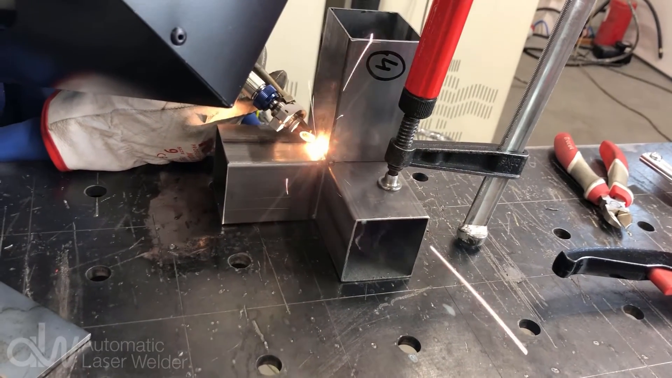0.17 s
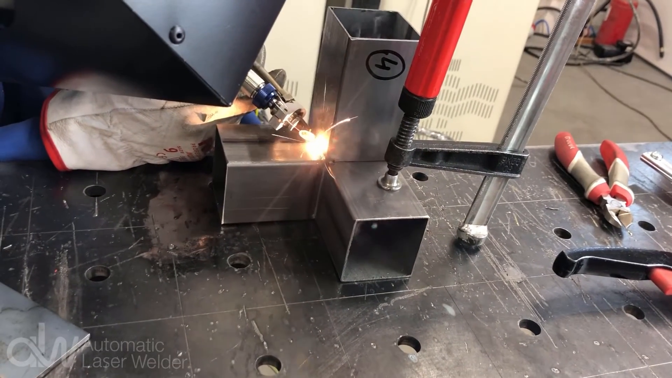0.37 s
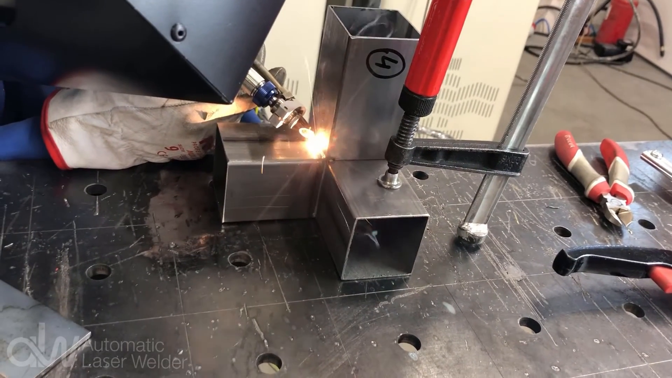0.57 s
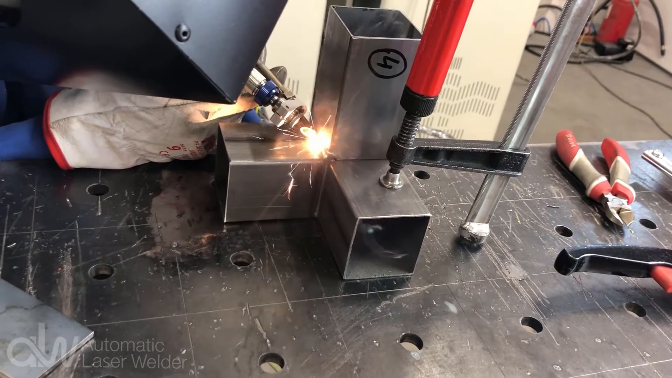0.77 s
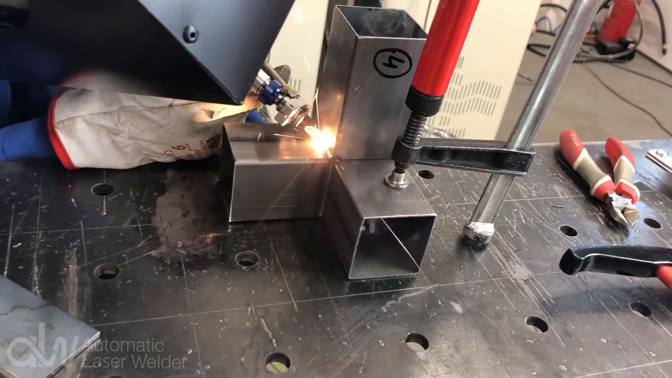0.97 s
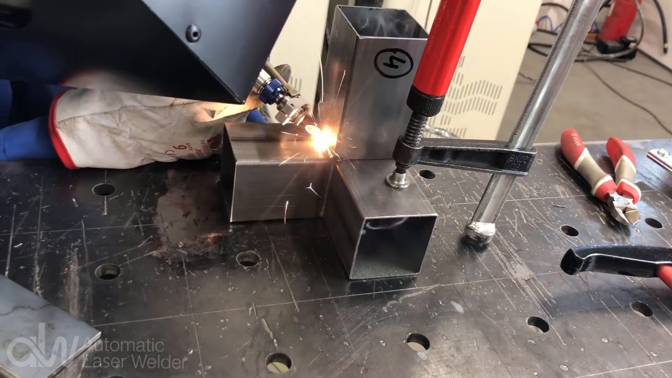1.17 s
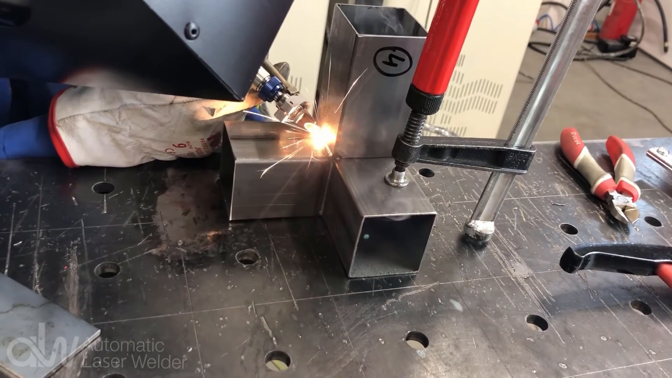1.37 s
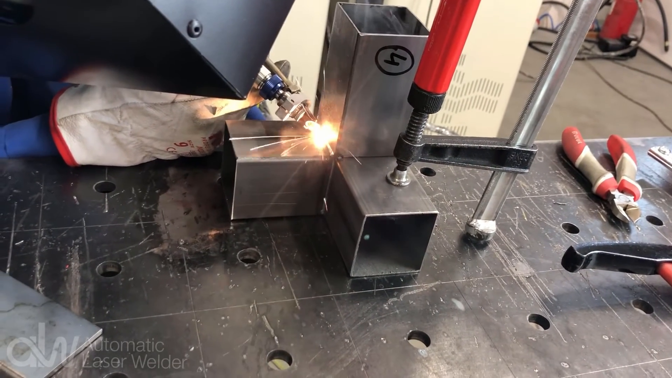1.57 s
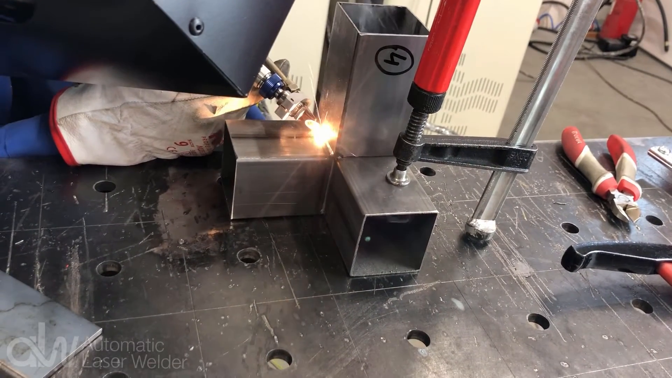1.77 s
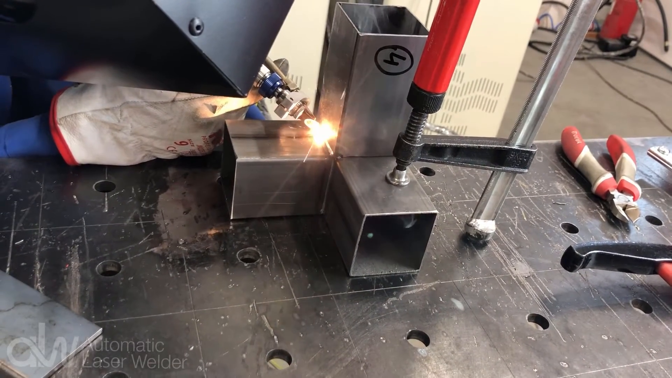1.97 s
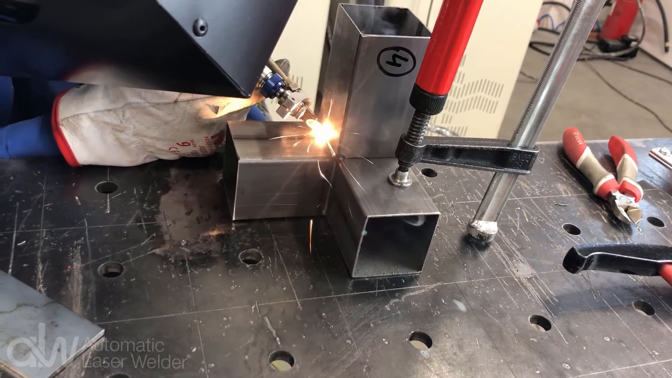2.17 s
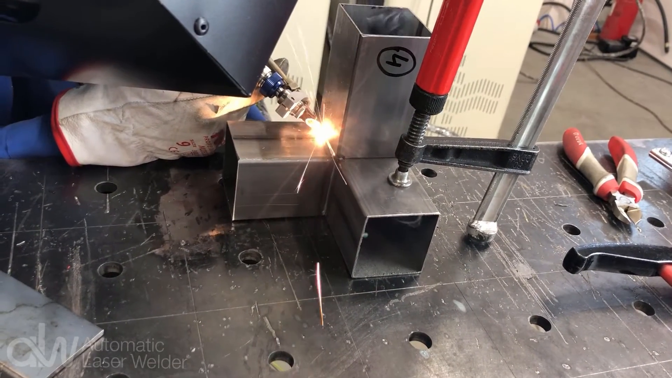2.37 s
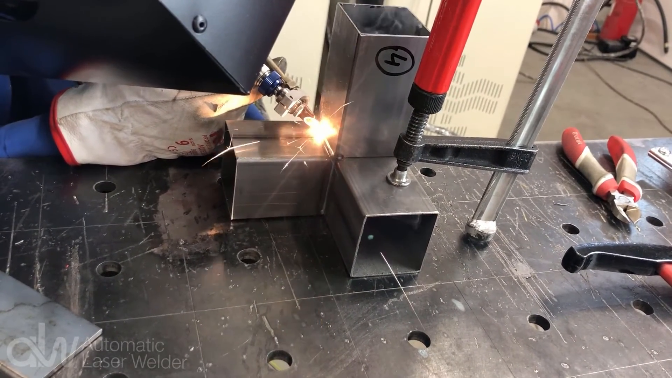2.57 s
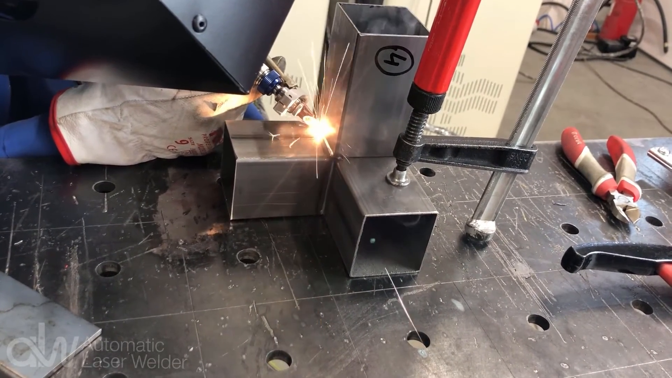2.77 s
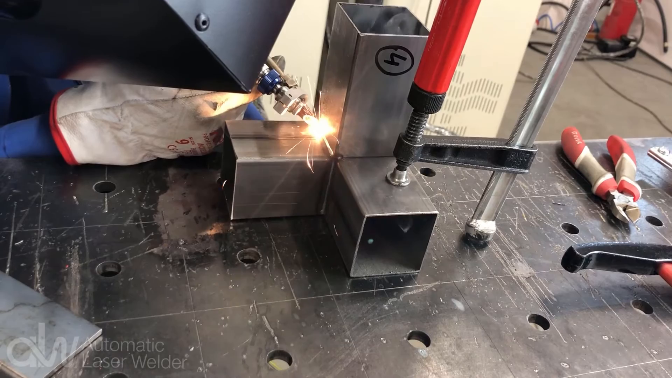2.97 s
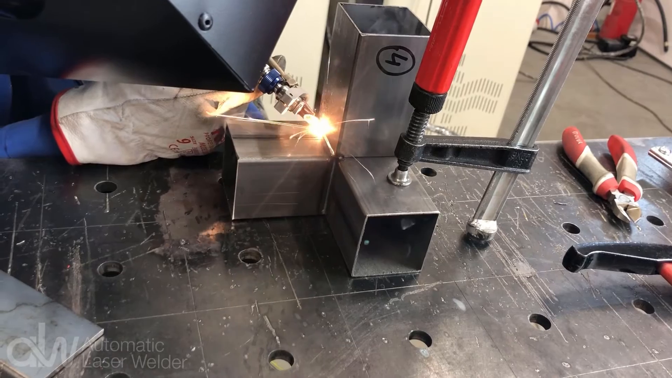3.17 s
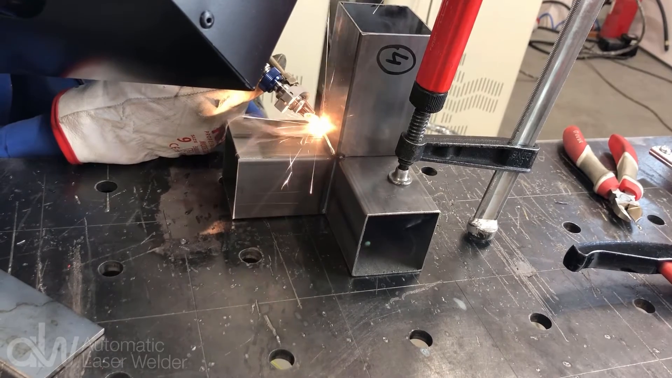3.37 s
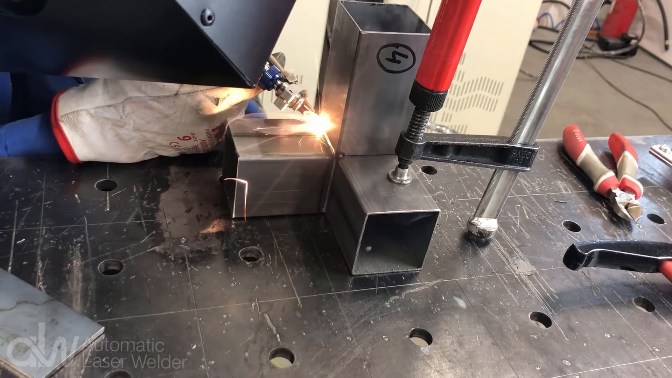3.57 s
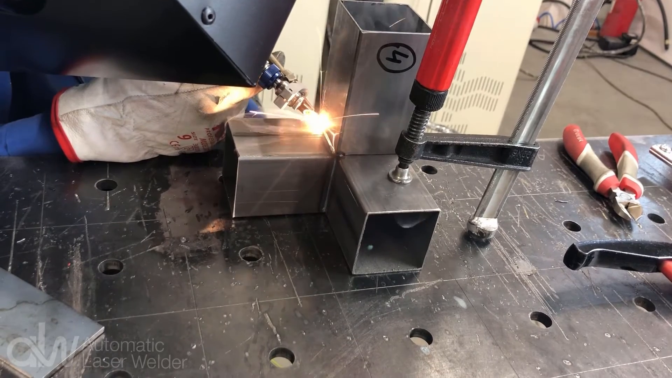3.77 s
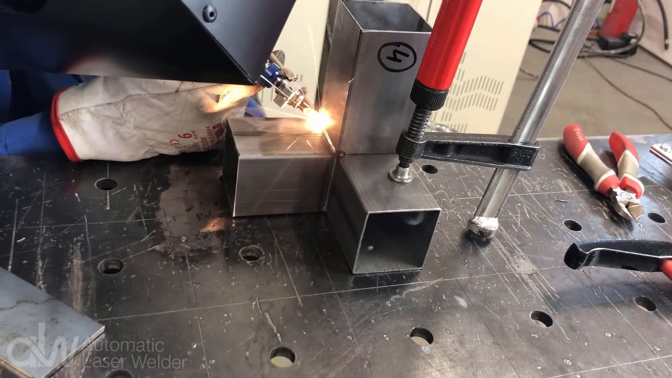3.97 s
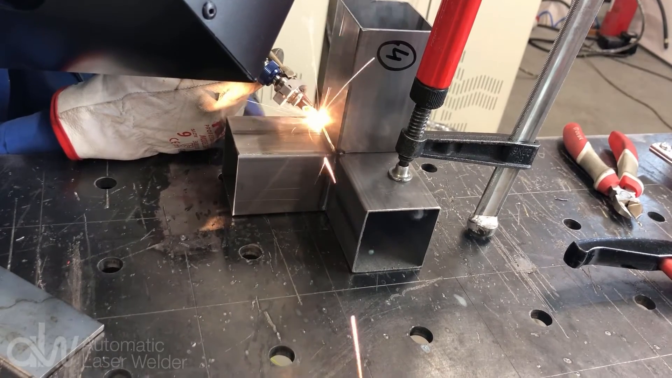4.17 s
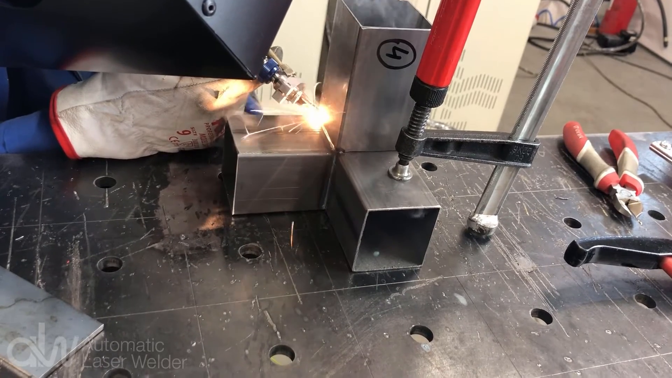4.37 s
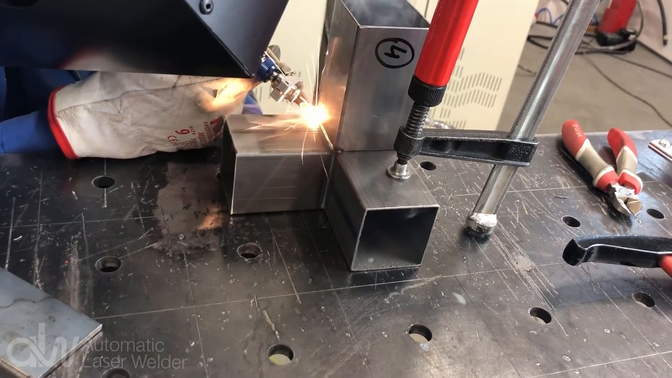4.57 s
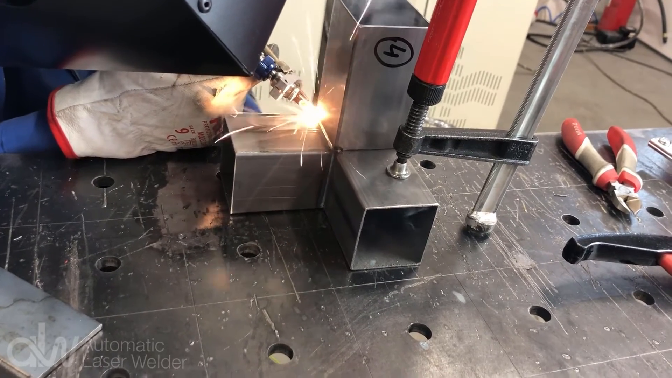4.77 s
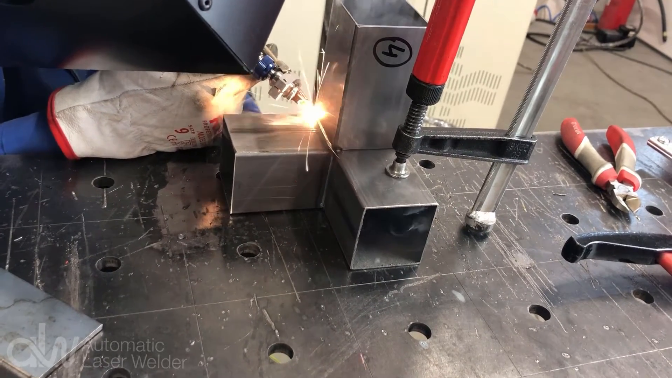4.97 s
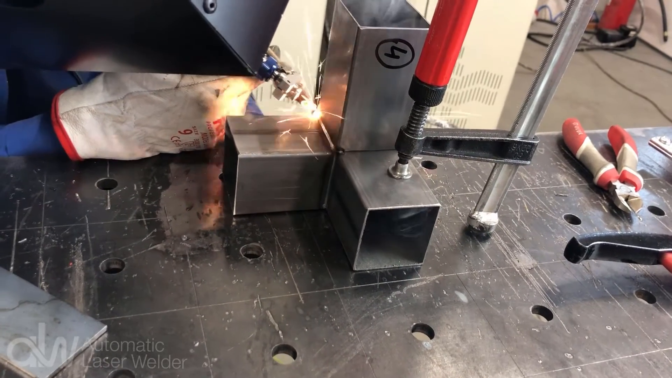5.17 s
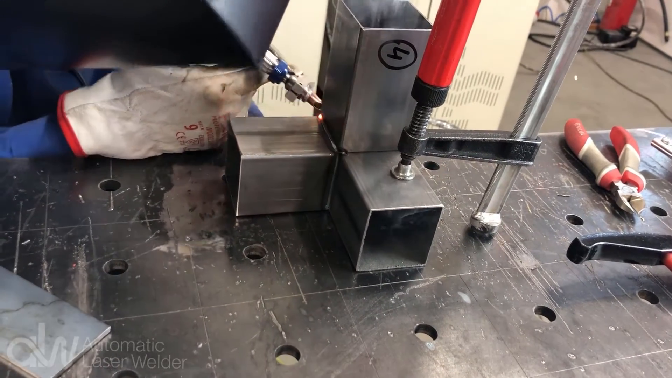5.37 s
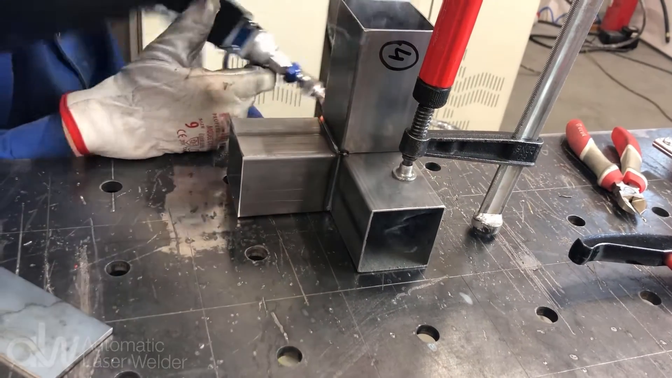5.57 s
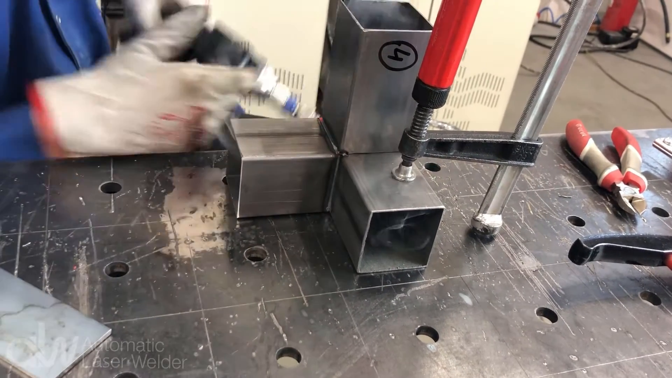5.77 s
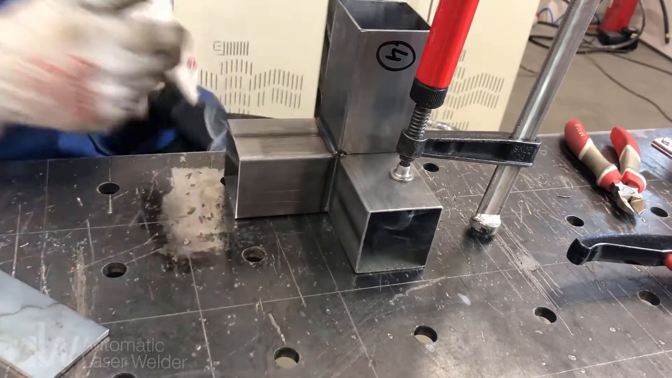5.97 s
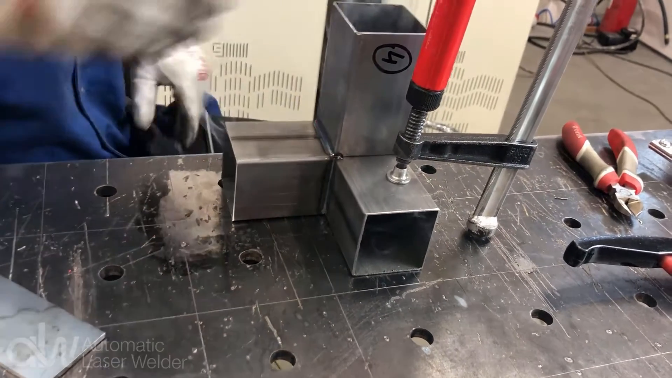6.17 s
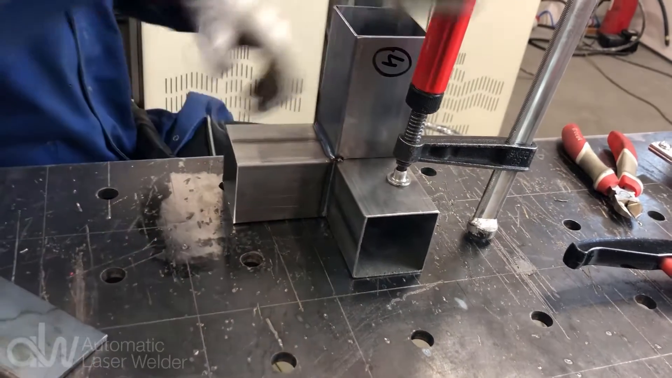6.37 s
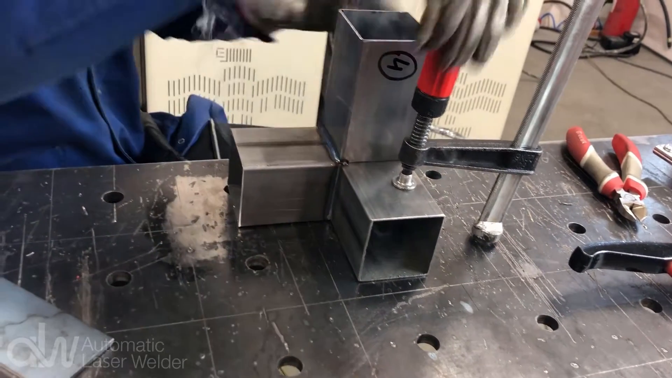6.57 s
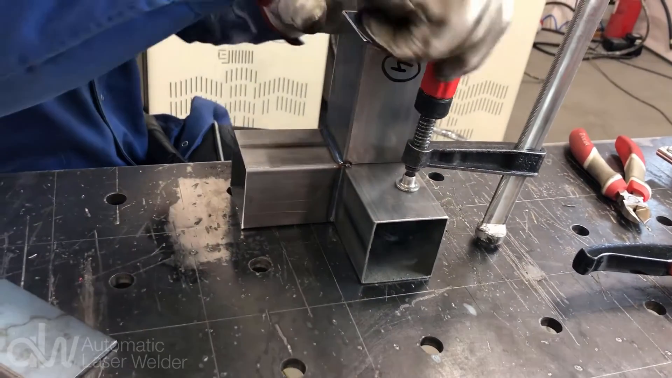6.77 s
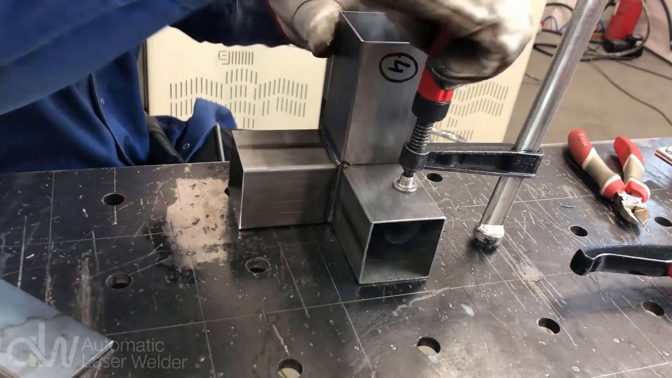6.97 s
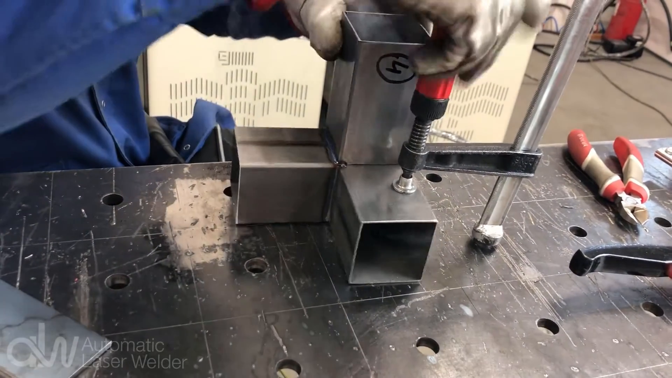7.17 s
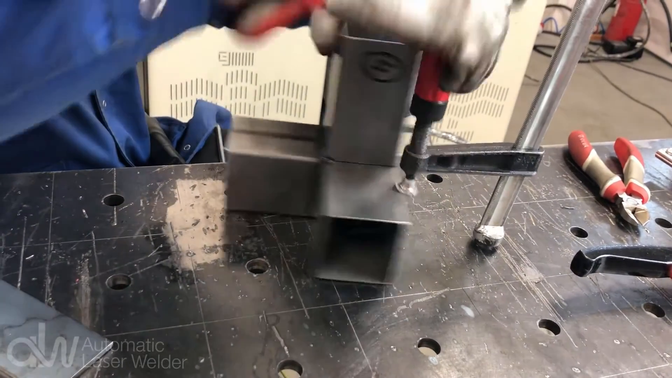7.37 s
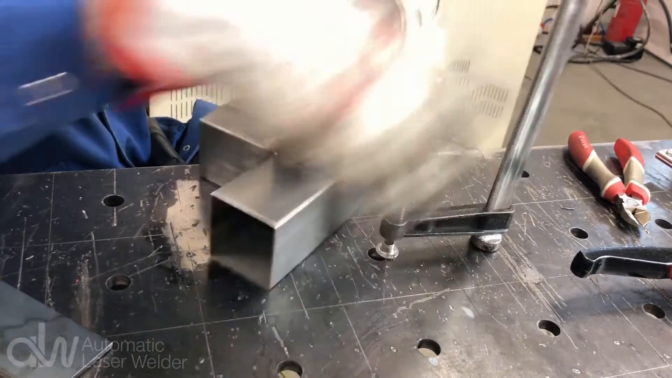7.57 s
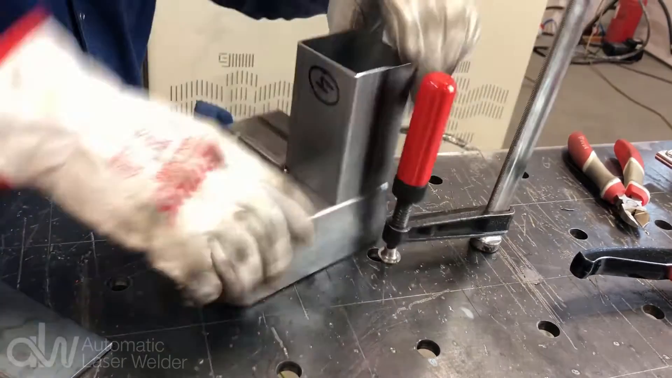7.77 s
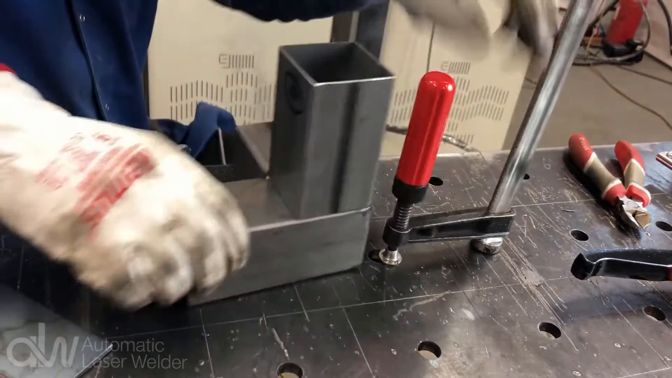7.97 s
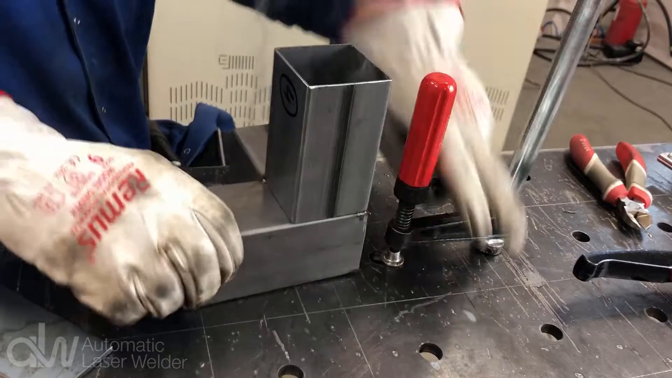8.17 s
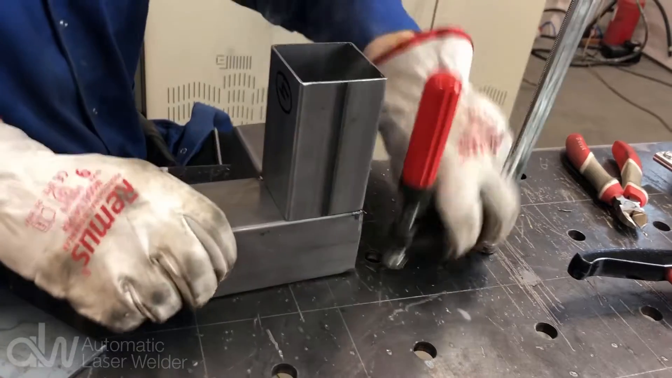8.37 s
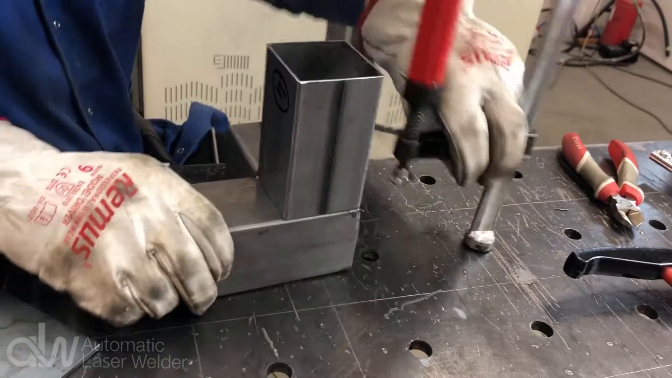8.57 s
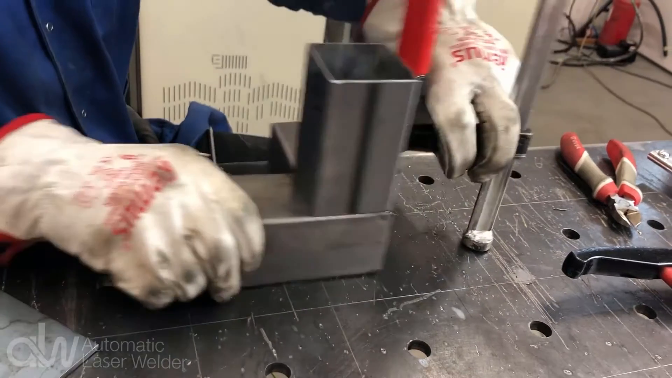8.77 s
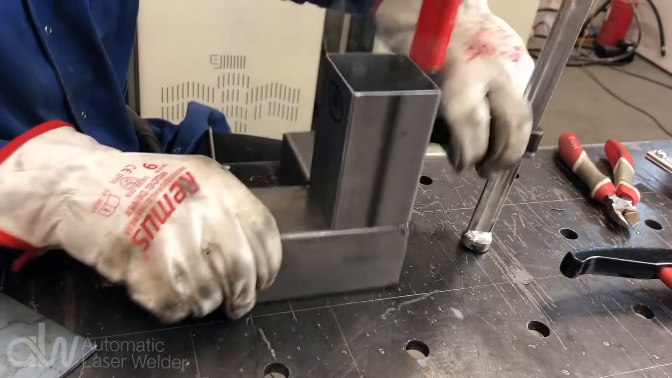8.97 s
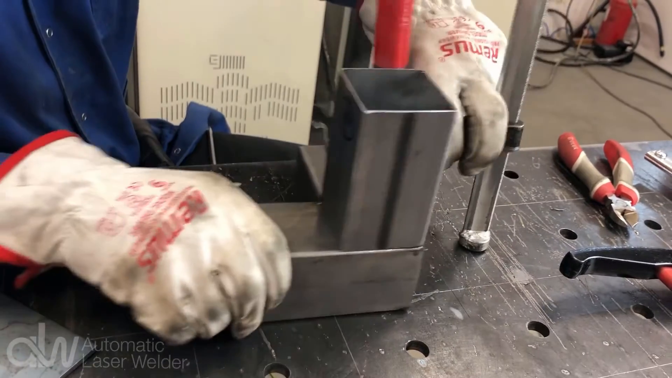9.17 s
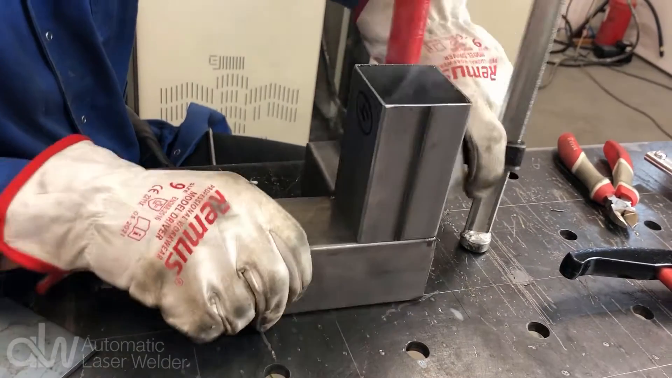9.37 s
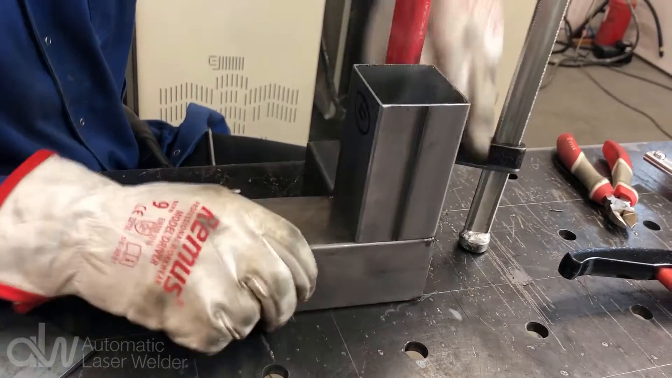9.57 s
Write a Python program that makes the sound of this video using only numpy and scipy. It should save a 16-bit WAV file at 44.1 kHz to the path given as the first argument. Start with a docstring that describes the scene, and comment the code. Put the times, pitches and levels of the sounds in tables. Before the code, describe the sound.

A steady, piercing jet of hiss, fluttering some fifty times a second and crackling finely, dominates the first five seconds. It stops suddenly; soft shielding gas dies away over quiet fans. After a pause come hard steel knocks, gritty dragging on a table and bright clamp clinks, closely miked with a light room tail.

```python
"""Laser welding and clamp handling.

A handheld laser torch welds a seam between square steel tubes on a steel table: a vapour jet, modelled as
filtered noise, hisses and throbs with the sweep of the beam. Shielding gas, resonant noise, flows on briefly.
Then a screw clamp is loosened, the workpiece is knocked and dragged round, and the clamp is set again: decaying
modes and noise bursts, with reflections and a room tail. Workshop fans, broad noise with rough tones, run on."""
import sys
import numpy as np
from scipy import signal
from scipy.fft import rfft, irfft, next_fast_len
from scipy.io import wavfile
from scipy.ndimage import uniform_filter1d

SR = 44100
rng = np.random.default_rng(int(sys.argv[2]) if len(sys.argv) > 2 else 0)


def unload_audio(sound):
    """Save the sound as a 16-bit wav file, at the path given as the first command line argument."""
    columns = np.transpose(np.atleast_2d(sound))
    # keep every value between -1 and 1, then stretch to whole-number steps
    steps = np.round(np.clip(columns, -1, 1) * 32767)
    wavfile.write(sys.argv[1], SR, steps.astype(np.int16))


N = 424241
TIME = np.arange(N) / SR

SWEEP_HZ = 53.32


def weld(turn_db=4.5, turn_width=.19, flutter_db=1.0, boil_db=1.0, spit_db=-27):
    """Amplitude-modulated jet noise: vapour from the melt slackens as the sweeping beam turns; droplets spit."""
    # the beam is swept to and fro across the seam, which makes the hiss throb; phase and width are in cycles
    phase = (SWEEP_HZ * TIME + .17 + .03 * walk(20)) % 1
    slack = np.exp(-((phase - .5) / turn_width) ** 2) * (1 + .25 * walk(50))
    level_db = -turn_db * slack + flutter_db * walk(450) + boil_db * walk(70)
    jet = grains(1.14) * undb(level_db)
    # on average 90 droplets a second
    droplets = rng.standard_normal(N) * (rng.random(N) < 90 / SR)
    spits = colour(droplets, [(300, -48), (1200, -9.5), (5000, -20), (15000, -9.5)])
    melt = nearby(corner(jet) + undb(spit_db) * spits, share=.45, t60=.06)
    return melt * beam()


WELD_DB, WELD_BEST_S, WELD_SAG_DB_PER_S2 = -7.9, 2.8, .42
BEAM_FADE_S, BEAM_FADE_DB_PER_S, BEAM_OFF_S = 5.139, 260, 5.218


def beam():
    """Amplitude envelope: loudest midway along the seam, sagging to its ends, then a power ramp down to off."""
    arch = WELD_DB - WELD_SAG_DB_PER_S2 * (TIME - WELD_BEST_S) ** 2
    fading = BEAM_FADE_DB_PER_S * np.maximum(TIME - BEAM_FADE_S, 0)
    return undb(arch - fading) * (TIME < BEAM_OFF_S)


SEAM_S = 5.2
# spectrum of the vapour jet: f/Hz, spectral level/dB
JET_SPECTRUM = [(300, -35), (900, -35.5), (2100, -28), (2700, -20.5), (4000, -17), (7000, -7), (8500, 0.5),
                (10500, -0.5), (13500, -6.5), (15600, -18.5)]
# resonances and notches of the corner between nozzle and tubes:
# f/Hz at the start, width/Hz, level/dB at the start of the seam, level/dB at its end
CORNER_RESONANCES = [(1530, 1000, 5.8, -8), (2840, 113, 1.3, -10.5), (3376, 70, 10, 4.5),
                     (4060, 780, 6.5, 0.5), (4760, 310, -3, 0.5), (5100, 200, -1.2, 5.5),
                     (5465, 200, -10.5, -11.5), (5956, 410, 8, 5.5), (6110, 400, -4.5, -13.5),
                     (6970, 320, -3.5, -13), (7760, 930, -4, -9), (8840, 230, -4, -9.5),
                     (9826, 490, -14, -7.5), (10130, 690, 13.5, -7.5), (10866, 1600, -26, -7),
                     (10890, 310, 15, -3.5), (12520, 1090, -0.5, -10), (15150, 580, -4, 11)]
# reflections from tube wall and table: delay/ms at the start of the seam, delay/ms at its end, amplitude share
CORNER_ECHOES = [(.73, .696, .2), (1.24, 1.159, .1), (1.752, 1.761, .065)]


def corner(x, rise=0.044):
    """Time-varying filtering: along the seam resonances rise and trade strength, and echo delays shift."""
    hz, s, frames = signal.stft(x, SR, nperseg=1024)
    hz, way = hz[:, None], np.minimum(s / SEAM_S, 1)
    db = slope(JET_SPECTRUM, hz)
    for f, width, first_db, last_db in CORNER_RESONANCES:
        peak_db = first_db + (last_db - first_db) * way
        detuning = 2 * (hz - f * (1 + rise * way)) / width
        db = db + peak_db / (1 + detuning ** 2)
    paths = 1
    for first_ms, last_ms, share in CORNER_ECHOES:
        delay_s = (first_ms + (last_ms - first_ms) * way) / 1000
        paths = paths + share * np.exp(-2j * np.pi * hz * delay_s)
    gain = undb(db) * paths
    # the filter keeps equal mean power all along the seam
    gain = gain / np.sqrt(np.mean(abs(gain) ** 2, axis=0))
    return unit(signal.istft(frames * gain, SR)[1][:N])


# shielding gas flows until the valve shuts, then the hose empties; amplitude is a power of the pressure left
GAS_DB, VALVE_SHUT_S, HOSE_EMPTY_S, GAS_POWER = -31.7, 5.23, .68, 1.65
# gas nozzle resonances: f/Hz, width/Hz, level/dB
NOZZLE_RESONANCES = [(4450, 330, -7), (6960, 400, -0.5), (7570, 320, 1), (9850, 700, -7),
                     (11630, 350, -16.5), (13660, 500, -16), (14500, 400, -11.5), (7960, 4600, -15)]


def gas(flutter_db=.8):
    """Turbulence exciting resonances: the nozzle whistles softly and dies with the pressure in the hose."""
    pressure = np.clip(1 - (TIME - VALVE_SHUT_S) / HOSE_EMPTY_S, 0, 1)
    level = undb(GAS_DB + flutter_db * walk(40))
    return resonant_noise(NOZZLE_RESONANCES) * pressure ** GAS_POWER * level


# steel knocking on the table, before the layer gains of knocks(): t/s, clang level/dB,
# weight = thud over clang level/dB, hardness = crack over clang level/dB, clang t60/s
STEEL_KNOCKS = [(7.089, -38, -14, 7, .2), (7.188, -28, -14, 4, .075), (7.256, -32, -14, -2, .3),
                (7.418, -28, -17, 9, .1), (7.446, -16.5, 0, -7.5, .15), (7.505, -7, -12, -12, .16),
                (7.513, -15, -6, 4, .27), (7.547, -16.5, -1, 8, .18), (7.656, -12, -26, -4.5, .25),
                (7.794, -21, -14, -11, .18), (7.841, -17.5, -16, -9, .09), (8.022, -27.5, -6, -12, .13),
                (8.431, -20.5, -2.5, 3, .2), (8.463, -17.5, -1, 2, .2), (8.8, -22, -7, -10, .22),
                (8.968, -15.5, -10, -9, .085), (9.043, -15, -7, -10, .13), (9.187, -21.5, -8, -9, .1),
                (9.265, -22.5, 2, 2.5, .06), (9.287, -13, -28, -3.5, .09)]
# modes of table and tubes: f/Hz, level/dB, t60/s
TABLE_MODES = [(571, -6.5, .3), (727, -6.5, 0.45), (866, -14, 0.28), (1063, -12.5, 0.28), (1185, -7.5, .25),
               (1320, -0.5, .3), (1532, 3.5, 0.24), (1720, -20, 0.23), (1785, 9, 0.22), (1904, -13, 0.12),
               (2013, -1.5, 0.16), (2320, 0.5, 0.18), (2580, -8.5, 0.3), (3100, -10, .2), (3700, -20, .25),
               (4180, -11.5, 0.34)]


def knocks(thud_t60=0.21, crack_share=0.49, rise_s=0.0003, thud_db=-1, clang_db=-.7, crack_db=-1, modes_db=-8.5):
    """Impact excitation: noise bursts stand for crowded low, middle and high modes; a few strong ones ring on."""
    t = TIME[:SR // 2]
    thuds, clangs, cracks, rings = [], [], [], []
    for s, db, weight_db, hardness_db, t60 in STEEL_KNOCKS:
        # a light blow glances off, so it builds up more slowly
        contact = 1 - np.exp(-t / (rise_s * undb(-db / 2)))
        thuds.append((s, db + weight_db, contact * fade(t, thud_t60)))
        clangs.append((s, db, contact * fade(t, t60)))
        cracks.append((s, db + hardness_db, contact * fade(t, crack_share * t60)))
        rings.append((s, db, contact * ring(TABLE_MODES)))
    # noise spectra: f/Hz, level/dB
    low = [(100, -24), (350, -11.5), (700, -1), (1150, -4.5), (1700, -7), (4000, -52)]
    middle = [(600, -56), (1250, 2.5), (1800, 4.5), (2500, 3), (3400, -3.5), (5000, -16.5), (12000, -45)]
    high = [(1500, -20), (3700, 12.5), (7000, 15.5), (9000, 8.5), (12000, 6), (15500, 1)]
    thud = place(thuds) * colour(grains(0.69), low)
    clang = place(clangs) * colour(grains(3.1), middle)
    crack = place(cracks) * colour(grains(3), high)
    struck = undb(thud_db) * thud + undb(clang_db) * clang + undb(crack_db) * crack
    return struck + undb(modes_db) * place(rings)


def drag(body_db=-2.3, grit_db=-.7, modes_db=-6.5, slip_t60=0.033, burr_db=-7, burr_t60=.014):
    """Stick-slip friction: each slip of steel on the table is a gritty burst over table modes; burrs tick."""
    t = TIME[:SR // 10]
    # on average 100 catches a second, of unequal strength
    catches = (rng.random(N) < 100 / SR) * rng.uniform(.4, 1, N) ** 2
    slip_power = np.abs(signal.fftconvolve(catches, fade(t, slip_t60) ** 2)[:N])
    slips = unit(np.sqrt(.12 + slip_power))
    burrs = unit(signal.fftconvolve(catches ** 3, fade(t, burr_t60))[:N])
    body_spectrum = [(250, -22), (700, 2.5), (1800, -3.5), (3200, -8.5), (5000, -21), (12000, -47)]
    grit_spectrum = [(1500, -23.5), (3700, -1), (6500, 0), (10000, -8.5), (15500, -14)]
    body = colour(grains(4.4) * slips, body_spectrum)
    modes = unit(signal.fftconvolve(grains(1.2) * slips, ring(TABLE_MODES))[:N])
    roughness = np.hypot(np.sqrt(slips), undb(burr_db) * burrs)
    grit = colour(grains(3) * roughness, grit_spectrum)
    body_gain, grit_gain = shoving()
    low = (undb(body_db) * body + undb(modes_db) * modes) * body_gain
    return low + undb(grit_db) * grit * grit_gain


# light rubbing all the while the parts are in hand
HANDLING_FROM_S, HANDLING_TO_S, RUB_BODY_DB, RUB_GRIT_DB = 7.06, 9.4, -51, -54
# shoves of steel over the table, before the layer gains of drag():
# t/s at the fastest, rise/s, fall/s, body level/dB, grit level/dB
TABLE_SHOVES = [(7.3, .04, .08, -42, -42), (7.4, .13, .14, -38, -35), (7.6, .11, .23, -16, -28),
                (7.78, .14, .22, -26, -41), (7.93, .14, .18, -32, -38.5), (8.37, .04, .1, -32, -46),
                (8.63, .2, .12, -30.5, -37), (8.72, .08, .12, -30, -35), (8.82, .06, .08, -20.5, -28.5),
                (9.08, .2, .11, -21.5, -33), (9.62, .1, .1, -41, -43)]


def shoving():
    """Friction level following sliding speed: gains of body and grit swell with each shove over light rubbing."""
    held = (TIME > HANDLING_FROM_S) & (TIME < HANDLING_TO_S)
    body, grit = held * undb(RUB_BODY_DB), held * undb(RUB_GRIT_DB)
    for s, rise_s, fall_s, body_db, grit_db in TABLE_SHOVES:
        speed = swell(s, rise_s, fall_s)
        body = np.maximum(body, speed * undb(body_db))
        grit = np.maximum(grit, speed * undb(grit_db))
    return body, grit


# the clamp's rail is struck: t/s, ring level/dB
RAIL_STRIKES = [(7.420, -26), (7.548, -14), (8.215, -43), (8.433, -15), (8.465, -17)]
# modes of the rail: f/Hz, level/dB, t60/s
RAIL_MODES = [(3480, -9, .06), (4506, 1, .12), (5733, 3, .13), (7127, -3, .17), (9356, -4, .17),
              (10480, -8, .1), (11410, -9, .21), (12370, -8, .22), (13560, -3, .14), (14420, -5, .19),
              (15720, 0, .11)]
# the sliding jaw tips against the rail: t/s, ring level/dB
JAW_STRIKES = [(7.555, -27), (8.433, -12), (8.979, -21), (8.995, -28), (9.233, -35)]
# modes of the jaw: f/Hz, level/dB, t60/s
JAW_MODES = [(6430, -1, 0.039), (6853, -11, 0.11), (8900, -10, 0.093), (11200, -18, 0.064)]
# spectrum of the jaw's skid down the rail: f/Hz, spectral level/dB
SKID_SPECTRUM = [(600, -16), (1400, -8.5), (2200, -1), (3300, -13), (4300, -19), (5200, -5), (7500, -10.5),
                 (10000, -12.5), (15500, -15)]
# modes of the clamp arm: f/Hz, level/dB, t60/s
ARM_MODES = [(2020, -13, .15), (2440, -1.5, 0.19), (4129, -10, .2), (5356, -8.5, 0.22), (5950, -5, .16),
             (7520, -0.5, .1), (8200, 1.5, 0.18), (12700, -8, .15)]
SKID_PEAK_S, SKID_RISE_S, SKID_FALL_S, SKID_DB = 9.289, .009, .022, -7


def clamp(arm_db=-14.5, tick_db=-6, tick_growth=.75, tick_t60=0.024):
    """Modal excitation: struck rail and jaw chink, light taps mostly tick; the jaw's skid drives the arm modes."""
    taps = RAIL_STRIKES + chatter()
    rail = place((s, db, ring(RAIL_MODES)) for s, db in taps)
    jaw = place((s, db, ring(JAW_MODES)) for s, db in JAW_STRIKES)
    # ticks grow less steeply than the ringing
    tick = fade(TIME[:SR // 2], tick_t60)
    ticks = place((s, tick_db + tick_growth * db, tick) for s, db in taps + JAW_STRIKES)
    ticks = ticks * colour(grains(2), [(1500, -16), (4000, 2), (7500, -4), (10000, -9), (15000, -18)])
    skid_gain = swell(SKID_PEAK_S, SKID_RISE_S, SKID_FALL_S) * undb(SKID_DB)
    skid = colour(grains(2), SKID_SPECTRUM) * skid_gain
    arm = ring(ARM_MODES)
    arm_ring = signal.fftconvolve(skid, arm / np.linalg.norm(arm))[:N]
    return rail + ticks + jaw + skid + undb(arm_db) * arm_ring


# the jaw chatters evenly against the rail while the clamp is lifted, a little harder each time
CHATTER_S, CHATTER_GAP_S, CHATTER_DB, CHATTER_GROWTH_DB = 8.278, .024, -41.5, .4


def chatter(count=6):
    """Periodic impact: the jaw's run of light taps on the rail, as t/s, ring level/dB."""
    return [(CHATTER_S + k * CHATTER_GAP_S, CHATTER_DB + k * CHATTER_GROWTH_DB) for k in range(count)]


def nearby(x, share=.5, t60=.06, count=60):
    """Comb filtering by early reflections: table top, tubes and cabinet throw the sound back."""
    lag_s, size = rng.uniform(.002, .03, count), rng.standard_normal(count)
    size = size * fade(lag_s, t60)
    paths = np.bincount((lag_s * SR).astype(int), share * size / np.linalg.norm(size))
    return (x + signal.fftconvolve(x, paths)[:N]) / np.sqrt(1 + share ** 2)


def room(x, low_t60=0.66, high_t60=0.28, wet_db=-17):
    """Diffuse reverberation: the workshop's tail builds up late and grows duller as it dies."""
    t = TIME[:SR]
    noise = rng.standard_normal(SR)
    low = signal.sosfilt(signal.butter(2, 2500, fs=SR, output="sos"), noise)
    tail = low * fade(t, low_t60) + 0.9 * (noise - low) * fade(t, high_t60)
    tail = tail * np.minimum(t / 0.012, 1)
    return x + undb(wet_db) * signal.fftconvolve(x, tail / np.linalg.norm(tail))[:N]


# spectrum of the workshop fans: f/Hz, spectral level/dB
FAN_SPECTRUM = [(15, -47), (25, -7.5), (48, -7.5), (144, -6), (253, -3), (340, -12.5), (368, -8.5),
                (567, -10), (1110, -22.5), (1530, -26.5), (1710, -27), (2060, -29), (3090, -34),
                (4260, -38.5), (15500, -53)]
# rough tones of the fans: f/Hz, width/Hz, level/dB
FAN_RESONANCES = [(198, 25, -40), (253.6, 9.7, -41), (331.6, 1.9, -45.5)]


def fans(level_db=-32.22):
    """Broadband flow noise with narrow bands: extractor and cooling fans rush, wavering, with rough tones."""
    rush = colour(rng.standard_normal(N), FAN_SPECTRUM) * undb(level_db + .5 * walk(8))
    tones = sum(undb(db) * resonant_noise([(hz, width, 0)]) for hz, width, db in FAN_RESONANCES)
    return rush + tones


def undb(db):
    """Logarithmic level: decibels to amplitude gain."""
    return 10 ** (np.asarray(db) / 20)


def unit(x):
    """Normalisation to an rms of 1."""
    return x / np.sqrt(np.mean(x ** 2))


def slope(points, hz):
    """Spectral envelope: level/dB interpolated on a log-frequency axis."""
    f, db = np.transpose(points)
    return np.interp(np.log(hz + 1), np.log(f), db)


def colour(x, points):
    """Linear filtering: shape a sound by a spectrum (f/Hz, level/dB); rms 1."""
    size = 2 ** 19
    gain = undb(slope(points, np.fft.rfftfreq(size, 1 / SR)))
    return unit(irfft(rfft(x, size) * gain)[:N])


def resonant_noise(peaks):
    """Resonance: white turbulence shaped by peaks (f/Hz, width/Hz, level/dB); rms 1."""
    size = next_fast_len(N, True)
    hz = np.fft.rfftfreq(size, 1 / SR)
    power = sum(undb(db) ** 2 / (1 + ((hz - f) / width) ** 2) ** 2 for f, width, db in peaks)
    return unit(irfft(np.sqrt(power) * rfft(rng.standard_normal(size)))[:N])


def walk(rate):
    """Slow random fluctuation: straight lines between chance values, rate per second; spread near 1."""
    return np.interp(TIME * rate, np.arange(N // 8), rng.standard_normal(N // 8)) * np.sqrt(1.5)


def grains(spread_db):
    """Impulsive noise: dense tiny clicks, the more unequal the larger the spread; rms 1."""
    size_db = spread_db * np.minimum(rng.exponential(size=N), 5)
    return unit(rng.standard_normal(N) * undb(size_db))


def fade(t, t60):
    """Exponential free decay: 60 dB down in t60 seconds."""
    return np.exp(-np.log(1000) * t / max(t60, .005))


def ring(modes):
    """Modal superposition for half a second; every blow shares its energy a little differently among modes."""
    t, out = TIME[:SR // 2], 0
    sizes = undb(np.array(modes)[:, 1] + 2 * rng.standard_normal(len(modes)))
    for (hz, _, t60), size in zip(modes, sizes):
        out = out + size * fade(t, t60) * np.sin(2 * np.pi * (hz * t + rng.random()))
    return out / np.sqrt(np.sum(sizes ** 2) / 2)


def place(sounds):
    """Linear superposition: lay sounds (t/s, level/dB, sound) on the time line."""
    out = np.zeros(N + SR)
    for s, db, sound in sounds:
        out[int(s * SR):][:len(sound)] += undb(db) * sound
    return out[:N]


def swell(peak_s, rise_s, fall_s):
    """Exponential growth and decay: a push rises 20 dB in rise_s to its peak, then falls 20 dB in fall_s."""
    return undb(-20 * np.maximum((peak_s - TIME) / rise_s, (TIME - peak_s) / fall_s))


def scene():
    """Superposition of sources: torch, then handling in the room, over the fans."""
    handling = nearby(knocks() + drag(), share=.55, t60=.02) + clamp()
    return (weld() + gas() + room(handling) + fans())[None]


TOP_HZ = 15800


def record(dry, ceiling_db=-11.0, low_cut_hz=42):
    """Band limiting and compression: deep bass is cut, loud passages held down, peaks rounded, the top cut."""
    sound = signal.sosfilt(signal.butter(4, low_cut_hz, "high", fs=SR, output="sos"), dry)
    # mean power over 37 ms steers the gain
    power = np.abs(uniform_filter1d(sound ** 2, size=1650, axis=-1))
    held = sound / (1 + (power / undb(ceiling_db) ** 2) ** 2) ** (1 / 4)
    rounded = held / (1 + (held / .84) ** 8) ** (1 / 8)
    return signal.sosfilt(signal.ellip(12, .1, 80, TOP_HZ, fs=SR, output="sos"), rounded)


dry = scene()
out = record(dry)
unload_audio(out)
```